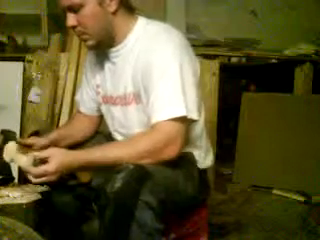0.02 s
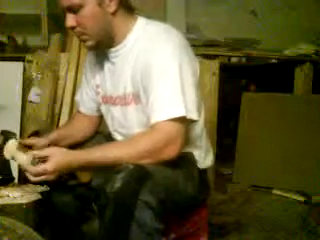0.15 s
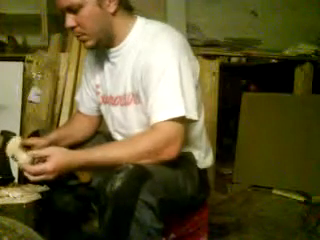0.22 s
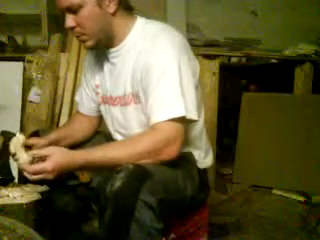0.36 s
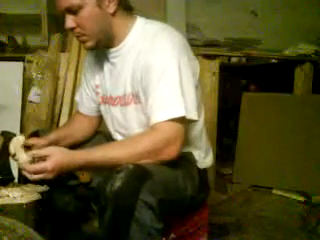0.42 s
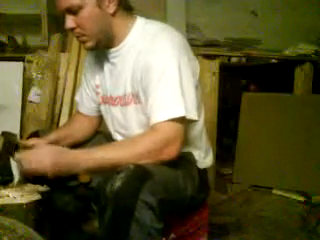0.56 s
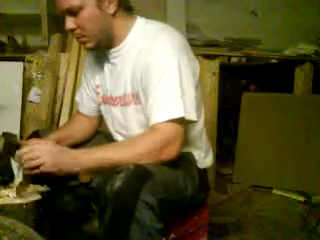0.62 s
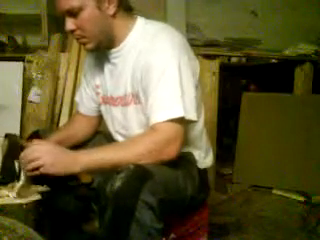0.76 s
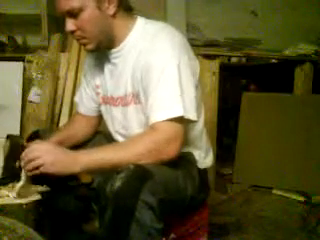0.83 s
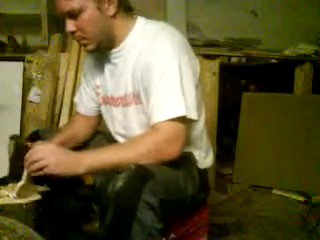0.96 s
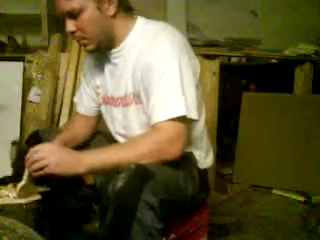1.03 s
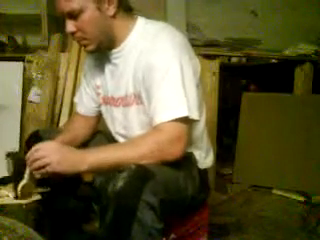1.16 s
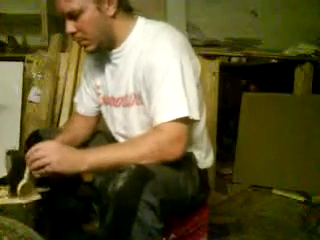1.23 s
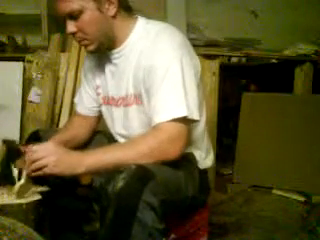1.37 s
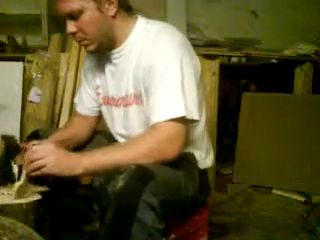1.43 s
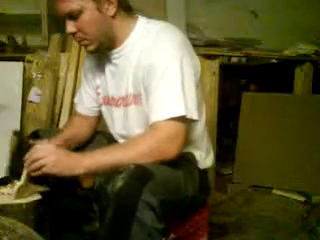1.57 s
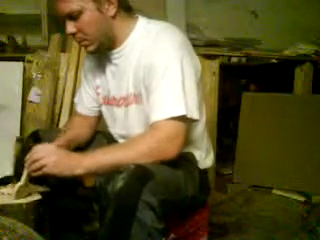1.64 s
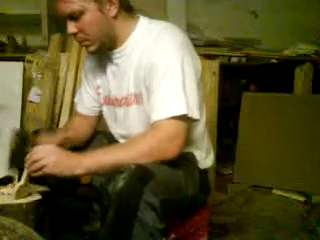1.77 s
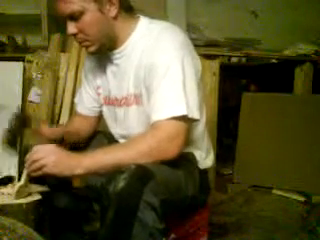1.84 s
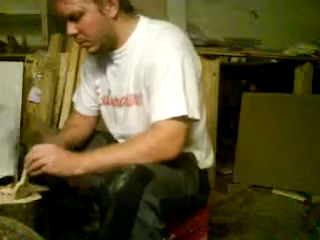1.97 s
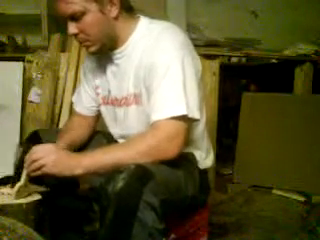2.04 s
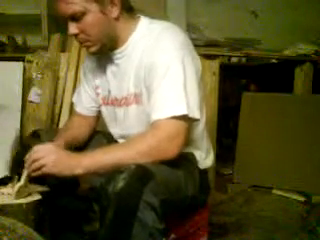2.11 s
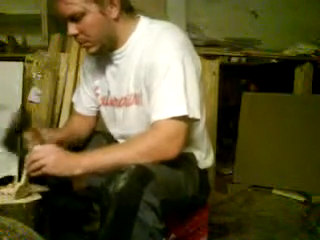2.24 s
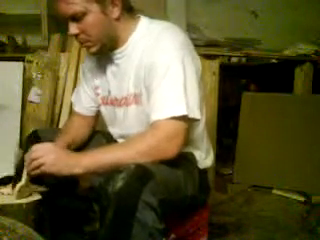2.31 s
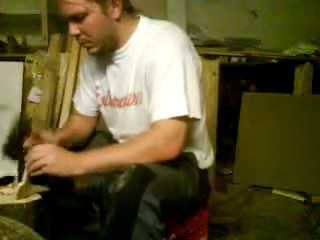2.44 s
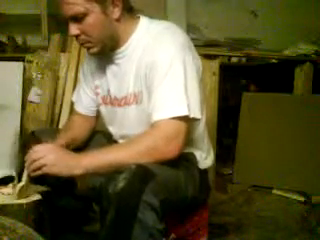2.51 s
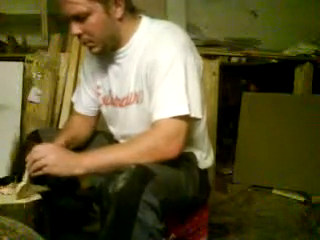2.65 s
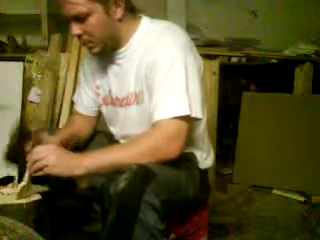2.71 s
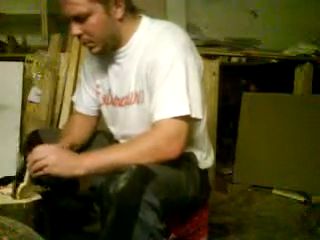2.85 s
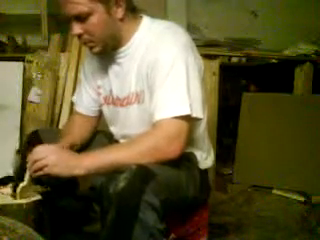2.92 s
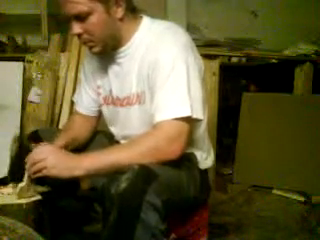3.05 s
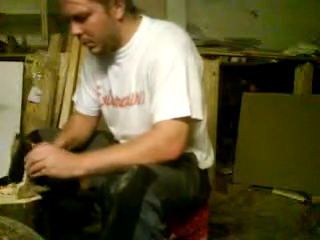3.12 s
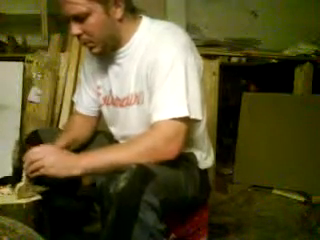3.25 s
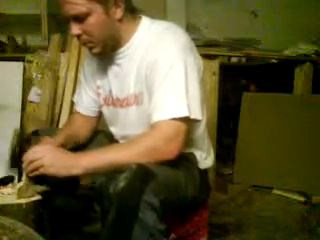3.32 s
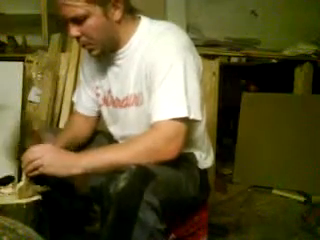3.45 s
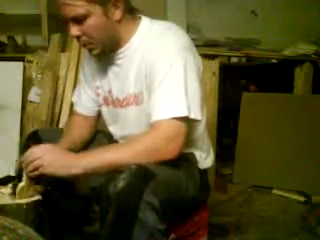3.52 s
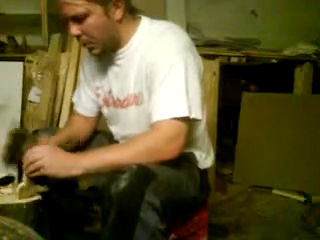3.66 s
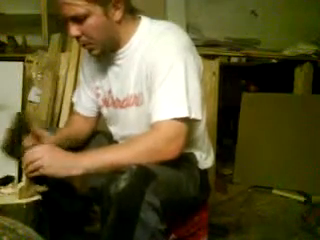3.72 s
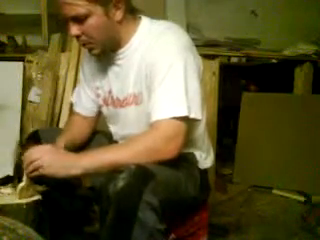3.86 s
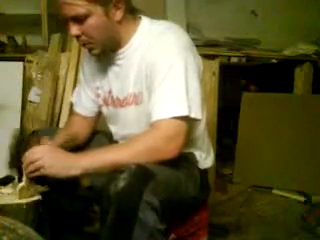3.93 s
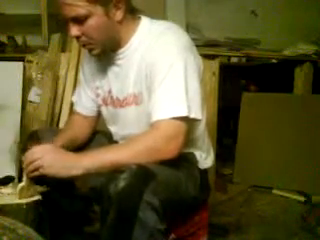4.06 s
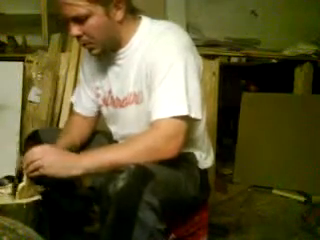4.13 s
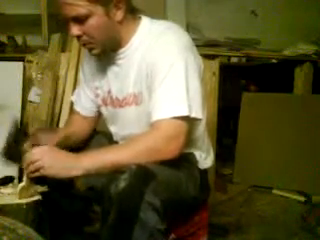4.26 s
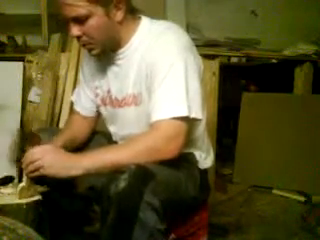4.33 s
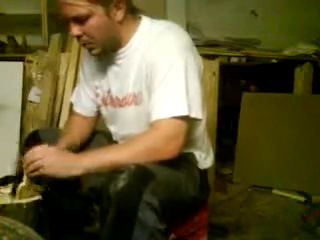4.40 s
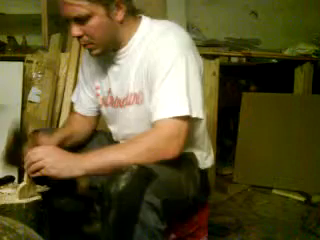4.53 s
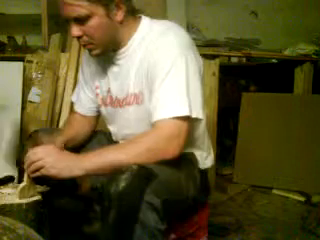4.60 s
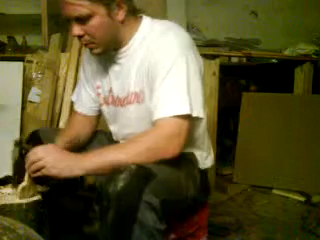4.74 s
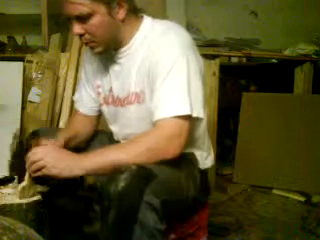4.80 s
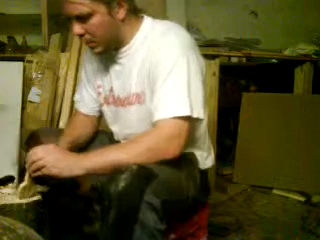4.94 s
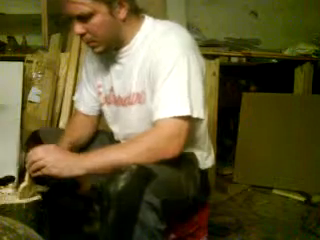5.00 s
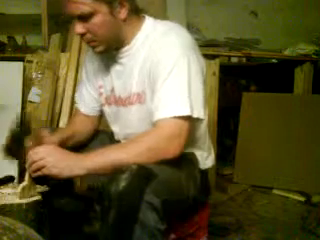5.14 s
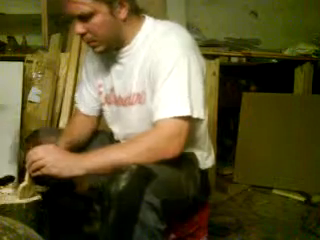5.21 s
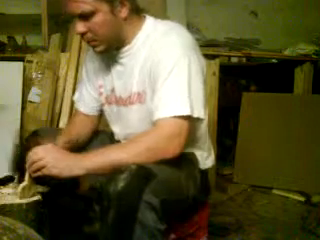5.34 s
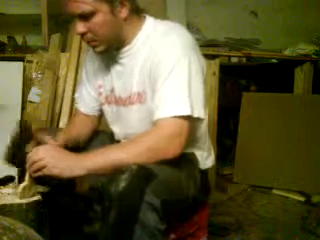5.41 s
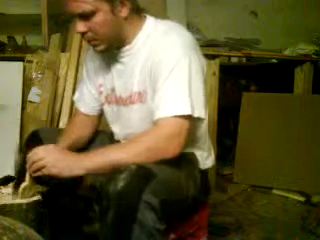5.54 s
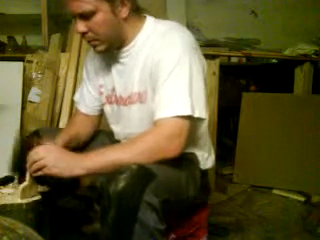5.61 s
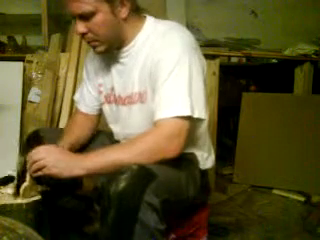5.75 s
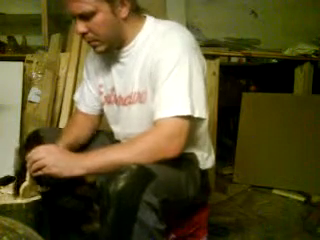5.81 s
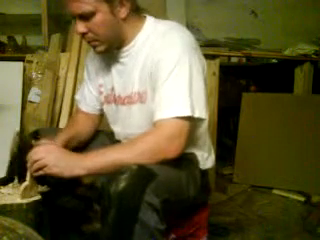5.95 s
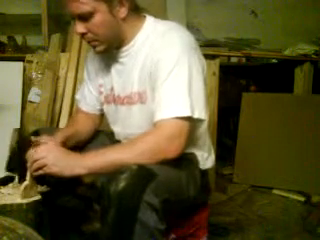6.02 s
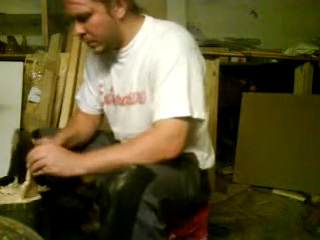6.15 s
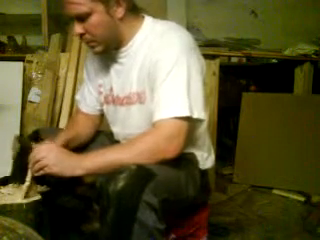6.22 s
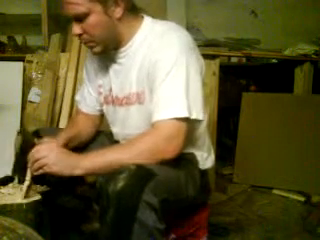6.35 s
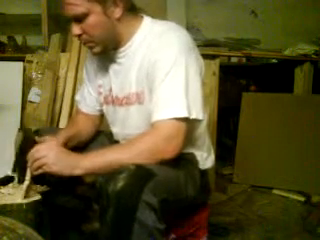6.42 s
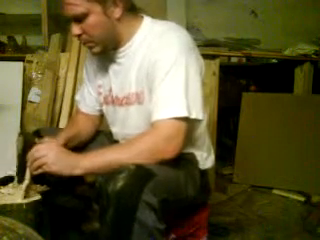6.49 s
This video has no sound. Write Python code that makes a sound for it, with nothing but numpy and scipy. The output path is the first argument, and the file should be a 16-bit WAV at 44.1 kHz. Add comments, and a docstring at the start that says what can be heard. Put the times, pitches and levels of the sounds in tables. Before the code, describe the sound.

A hatchet chops wood on a block in quick, sharp strikes with low thuds, in a small echoing workshop over steady hiss.

```python
"""In a small, echoing workshop, a carver sets a piece of wood on a chopping block and trims it with
quick hatchet blows. Each blow is a crack of tearing fibres that makes the wood ring; a moment later
the wood drives into the block, which answers with a low thud. The walls prolong both.
Under it lies a steady hiss, which sinks after loud blows as an automatic volume control turns down."""
import sys
import numpy as np
from scipy import signal
from scipy.fft import rfft, irfft
from scipy.io import wavfile
from scipy.ndimage import uniform_filter1d

SR = 44100
rng = np.random.default_rng(int(sys.argv[2]) if len(sys.argv) > 2 else 0)


def wav_out(sig):
    """Save sig, one row per channel (or a flat mono array), as 16-bit PCM at SR to the path in sys.argv[1]."""
    wavfile.write(sys.argv[1], SR, np.round(np.clip(np.atleast_2d(sig).T, -1, 1) * 32767).astype(np.int16))


N = 289679
TIME = np.arange(N) / SR   # seconds since the start
AGE = np.arange(SR) / SR   # seconds since a blow
FIRM_THUD_DB = -12.5   # the thud setting that counts as a firm blow


def from_db(db):
    """Turn decibels into a number to multiply by."""
    return 10 ** (np.asarray(db) / 20)


def at_level(x, level_db):
    """Give a short sound the energy of 30 ms of steady sound at level_db."""
    return x / np.sqrt(np.sum(x ** 2) / (.03 * SR) + 1e-20) * from_db(level_db)


def at_pitch(points, hz):
    """Read between the rows of a (pitch_hz, value) table, with octaves evenly spaced."""
    pitches, values = np.transpose(points)
    return np.interp(np.log(hz + 1e-9), np.log(pitches), values)


def band(x, low_hz, high_hz, order=2):
    """Keep the sound between two pitches."""
    return signal.sosfilt(signal.butter(order, [low_hz, high_hz], "band", fs=SR, output="sos"), x + 1e-18)


def resonate(x, hz, width_hz):
    """Let a sound ring around one pitch."""
    r = np.exp(-np.pi * width_hz / SR)
    feedback = [1, -2 * r * np.cos(2 * np.pi * hz / SR), r * r]
    return signal.lfilter(np.array([1, 0, -1]) * (1 - r * r) / 2, feedback, x + 1e-18)


def add(out, start_s, sound):
    """Mix a sound in at its start time."""
    i = int(start_s * SR)
    out[i:i + len(sound)] += sound[:N - i]


def swell(rise_s):
    """A smooth rise from 0 to 1."""
    return 1 - np.exp(-(AGE / rise_s) ** 2)


def fade(fade_s):
    """A fall of 60 dB every fade_s seconds."""
    return from_db(-60 * AGE / fade_s)


def ringing(tones, colour, scatter_db, rise_cycles, fade_scale):
    """A struck object's tones build up and die away; colour (pitch_hz, level_db) weights them."""
    out = np.zeros(SR)
    for k, (hz, level_db, fade_s) in enumerate(tones):
        tone = np.sin(2 * np.pi * hz * AGE) * swell(rise_cycles / hz) * fade(fade_s * fade_scale)
        tone_db = level_db + at_pitch(colour, hz) + scatter_db * rng.normal()
        out += (-1) ** k * at_level(tone, tone_db)   # every other tone starts the opposite way
    return out


def background_hiss():
    """An even hiss that grows a little once the work begins."""
    # loudness of the hiss: time_s, level_db
    levels = [(0, -52.5), (1.1, -52), (1.4, -46.5), (1.7, -52), (1.999, -48), (3.3, -48), (4.9, -48),
              (6.57, -49)]
    # its balance from low to high: pitch_hz, level_db
    spectrum = [(25, -3), (45, -3), (70, -6), (150, -5), (300, -4.5), (520, -7.5), (900, -8.5), (1400, -11),
                (2200, -12.5), (4500, -15), (6600, -19.5), (7300, -28)]
    hz = np.arange(N // 2 + 1) * SR / N
    hiss = irfft(rfft(rng.standard_normal(N)) * from_db(at_pitch(spectrum, hz)), N)
    hiss /= np.std(band(hiss, 1000, 6500))
    return hiss * from_db(np.interp(TIME, *np.transpose(levels)))


def shop_echo(hz, direct_db):
    """The shop's answer to a click: the direct sound, then a dense wash off walls and timber."""
    # how long the echo lasts: pitch_hz, fade_s
    fade_times = [(130, 0.94), (320, 0.42), (750, 0.27), (1400, 0.27), (2400, 0.27), (3700, 0.24),
                  (5600, 0.2)]
    wash = rng.standard_normal(SR) * fade(at_pitch(fade_times, hz))
    wash /= np.linalg.norm(wash)
    near = rng.standard_normal(SR) * np.exp(-AGE / 0.024)   # off the block top, floor and knees
    wash += near / np.linalg.norm(near) * from_db(-23.5)
    wash[0] += from_db(direct_db)
    return wash


def wood_slides():
    """The wood rubs on the block with brief, faint squeaks."""
    # squeaks: middle_s, half_length_s, pitch_hz, width_hz, level_db
    squeaks = [(1.205, .02, 5500, 1500, -50), (1.34, .025, 2980, 220, -43.5), (1.385, .045, 3000, 160, -49),
               (1.375, .045, 4500, 3500, -49)]
    out = np.zeros(N)
    for middle_s, half_length_s, hz, width_hz, level_db in squeaks:
        rub = resonate(rng.standard_normal(N), hz, width_hz)
        rub /= np.sqrt(np.mean(rub ** 2))
        out += rub * from_db(level_db) * np.exp(-((TIME - middle_s) / half_length_s) ** 2)
    return out


def block_thud(colour, thud_db):
    """A blunt push bumps the block and makes it ring; even light blows leave a round, low hum."""
    # tones of the block and the low shop tones it wakes: pitch_hz, relative_db, base_fade_s
    block_tones = [(42, -30, 2.5), (81, -27, 1.1), (118, -19.5, .9), (156, -13.5, .62), (198, -25, .6),
                   (243, -15, .38), (266, -8.5, .5), (285, -17, .45), (324, -4.5, .42), (341, -10, .38),
                   (388, -6.5, .33), (415, -12, .3), (461, -9, .35), (722, -13, .33), (800, -6.5, .35),
                   (832, -10, .3), (869, -8, .27), (959, -6.5, .27)]
    hum_db = min(-20 + .3 * (thud_db - FIRM_THUD_DB), thud_db + 4)
    lowest_band_db = colour[0][1]
    bump = band(rng.standard_normal(SR), 230, 485, order=3) * swell(0.0063) * np.exp(-AGE / 0.025)
    floor_give = band(rng.standard_normal(SR), 83, 250) * swell(0.025) * np.exp(-AGE / 0.068)
    hum = np.sin(2 * np.pi * 272 * AGE) * swell(0.018) * fade(0.36)
    deep_colour = [(113, hum_db + 8.5)] + colour   # like the hum, deep tones follow the hatchet's weight
    ring = ringing(block_tones, deep_colour, scatter_db=3.7, rise_cycles=1.1, fade_scale=0.88)
    dull = at_level(bump, lowest_band_db - 10) + at_level(floor_give, hum_db - 10)
    return ring * from_db(-5.5) + dull + at_level(hum, hum_db - 2)


def wood_ring(colour, pitches_hz, ring_db):
    """Wood and chip ring roughly, at new pitches each blow, over the clear tones of wood and blade."""
    # tones of the wood and the hatchet head: pitch_hz, relative_db, base_fade_s
    clear_tones = [(1249, -15, .35), (1736, -13, .35), (2143, -17, .3), (2274, -17, .3), (2667, -15, .33),
                   (3598, -14, .35), (3655, -13, .35), (3774, -15, .33), (4132, -16, .3), (4747, -15, .3),
                   (5097, -15, .3), (5542, -17, .3)]
    rough = np.zeros(SR)
    for hz in pitches_hz:
        noise = resonate(rng.standard_normal(SR), hz, width_hz=420)
        noise = resonate(noise, hz, width_hz=420)   # a second pass sharpens the pitch
        rough += at_level(noise * fade(0.25), at_pitch(colour, hz) + ring_db)
    clear = ringing(clear_tones, colour, scatter_db=0, rise_cycles=5.4, fade_scale=0.86)
    return rough + clear * from_db(-2.5)


def fibre_snaps(tear_s):
    """The edge lands with one click, then fibres snap in a quickly fading run."""
    age = AGE[:SR // 16]
    snaps = rng.standard_normal(len(age)) * np.exp(-age / tear_s)
    snaps *= rng.random(len(age)) < 4000 / SR   # about 4000 snaps a second
    snaps /= np.linalg.norm(snaps) + 1e-12
    snaps[0] += from_db(-4)
    return snaps


def blow_levels(hz, contact, thud_db, crack_db, tilt):
    """A blow's level at each pitch: the bright contact plus a dull push that brightens with force."""
    # the push into the block: pitch_hz, relative_db
    push_spectrum = [(320, 1.5), (830, -8), (1400, -20.5), (2300, -30), (5300, -55)]
    push_tilt = .5 * (thud_db - FIRM_THUD_DB)   # dB per octave
    crack = crack_db + at_pitch(contact, hz) + tilt * np.log2(hz / 2850)
    push = thud_db + at_pitch(push_spectrum, hz) + push_tilt * np.log2(hz / hz[0])
    return 20 * np.log10(np.hypot(from_db(crack), from_db(push)))


def strikes(blows, contact):
    """Each blow cracks and rings at once; the block thuds a moment later, as the blow comes to rest."""
    # pitch ranges in which the crack echoes round the shop: low_hz, high_hz
    bands = [(230, 450), (600, 1100), (1100, 1800), (1800, 3000), (3000, 4500), (4500, 6300)]
    # how much of a blow is unpitched crack: pitch_hz, relative_db
    crack_share = [(320, -6), (750, 2.5), (1400, 1.5), (2400, 3), (3700, 1), (5600, 0)]
    centres_hz = np.sqrt(np.prod(bands, axis=1))
    echoes = [shop_echo(hz, direct_db=-20.5) for hz in centres_hz]
    out = np.zeros(N)
    for start_s, lag_s, tear_s, thud_db, crack_db, tilt, wood_hz, chip_hz, ring_db in blows:
        levels = blow_levels(centres_hz, contact, thud_db, crack_db, tilt)
        colour = list(zip(centres_hz, levels))
        snaps = fibre_snaps(tear_s)
        for (low_hz, high_hz), (hz, level_db), echo in zip(bands, colour, echoes):
            crack = band(signal.fftconvolve(snaps, echo)[:SR], low_hz, high_hz, order=4)
            if high_hz < 1200:
                crack *= 0.22 + swell(lag_s + 0.0014)   # the lows build as the blade slows
            add(out, start_s, at_level(crack, level_db + at_pitch(crack_share, hz)))
        add(out, start_s, wood_ring(colour, (wood_hz, chip_hz), ring_db))
        add(out, start_s + lag_s, block_thud(colour, thud_db))
    return out


def scene():
    """The carver at work, heard in one channel a few steps from the block."""
    # hatchet blows: start_s, thud_lag_s, tear_s, thud_db, crack_db, tilt_db_per_octave,
    # wood_hz, chip_hz, ring_db (the levels are relative; more tilt is brighter)
    chops = [(2.0995, 0.0013, 0.002, -29.5, -14, 2.5, 1860, 3750, 1),
             (2.406, 0.001, 0.0032, -22.5, -14.5, 2.2, 2140, 3600, -0.5),
             (2.695, 0.004, 0.016, -15, -20.5, 8, 1260, 3780, 7),
             (2.9737, 0.0035, 0.0018, -9.5, -18, 3, 1340, 3460, 1.5),
             (3.6342, .014, 0.0017, -9, -17, -2, 1040, 3730, -2),
             (3.9285, 0.011, 0.0033, -28.5, -24, -2.5, 1680, 5240, 1.5),
             (4.2185, 0.019, 0.0015, -15.5, -25, -3.5, 2210, 4820, 1.5),
             (4.491, .021, 0.0052, -12, -22, -4, 2190, 3400, -1),
             (4.7616, 0.01, 0.0011, -26, -22.5, -2, 2260, 3160, 0.5),
             (5.0815, 0.012, 0.0012, -26.5, -19.5, 2, 1650, 5100, -1),
             (5.351, 0.0012, 0.0017, -25, -25.5, -0.5, 1230, 4660, 5.5),
             (5.5901, 0.0026, 0.0019, -10.5, -21.5, -4, 870, 3740, -1.5),
             (5.8499, 0.016, 0.0027, -12, -20.5, 4.5, 1350, 4870, 1)]
    # the wood is set down and lightly tapped: same columns as chops
    taps = [(1.171, .004, 0.0059, -54, -46.5, 0, 1140, 1770, -0.53),
            (1.224, 0.0013, 0.0065, -20, -47, 4, 720, 1330, -1.5),
            (1.524, 0.0029, 0.0042, -51, -53, 0, 1100, 1700, -1.8),
            (1.749, 0.0015, 0.0022, -39, -43, -0.5, 1080, 1270, 2.6),
            (3.354, 0.0035, 0.0096, -49.5, -42, 5, 1120, 1250, -2)]
    # the edge cutting into wood: pitch_hz, relative_db
    chop_spectrum = [(320, -33), (830, -8.5), (1400, 1.5), (2300, 2), (3700, 2.5), (5300, 2)]
    # wood knocking on wood: pitch_hz, relative_db
    tap_spectrum = [(320, -7), (830, 7.5), (1400, 7.5), (2300, -2.5), (3700, -2.5), (5300, -5.5)]
    work = strikes(chops, chop_spectrum) + strikes(taps, tap_spectrum) + wood_slides()
    return (work + background_hiss())[None]


def volume_control(x, threshold_db, share, recover_db_per_s):
    """The volume drops at once under a loud blow and creeps back, so the hiss sinks and recovers."""
    power = uniform_filter1d(x ** 2, size=SR // 80)
    over_db = np.maximum(10 * np.log10(np.abs(power) + 1e-12) - threshold_db, 0)
    recovery_db = recover_db_per_s * TIME
    cut_db = np.maximum.accumulate(over_db * share + recovery_db, axis=-1) - recovery_db
    return x * from_db(-cut_db)


def record(dry):
    """Turn down the loud blows, round off the peaks and cut the highest treble."""
    peak_limit, cutoff_hz = .62, 7150
    held = volume_control(dry, threshold_db=-15.5, share=0.73, recover_db_per_s=22)
    rounded = peak_limit * np.tanh(held / peak_limit)
    return signal.sosfilt(signal.ellip(10, .3, 70, cutoff_hz, fs=SR, output="sos"), rounded)


dry = scene()
out = record(dry)
wav_out(out)
```